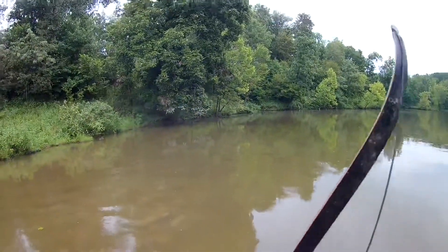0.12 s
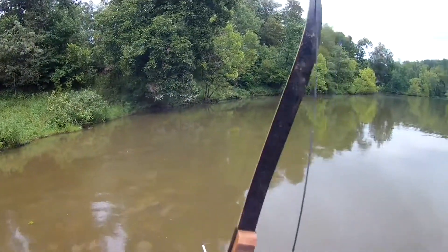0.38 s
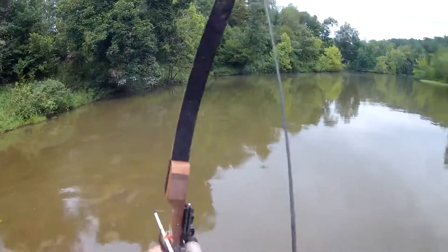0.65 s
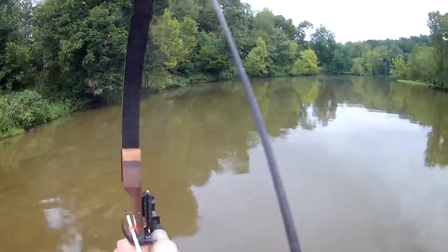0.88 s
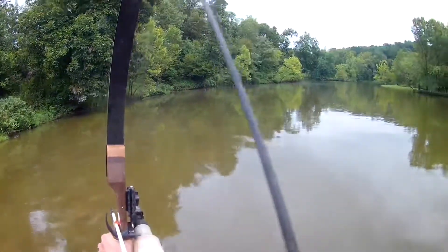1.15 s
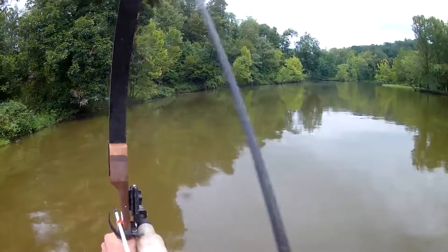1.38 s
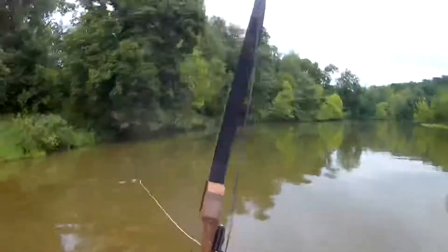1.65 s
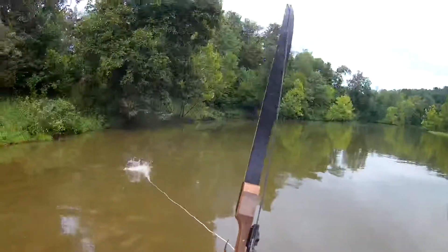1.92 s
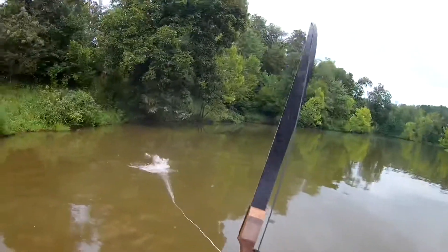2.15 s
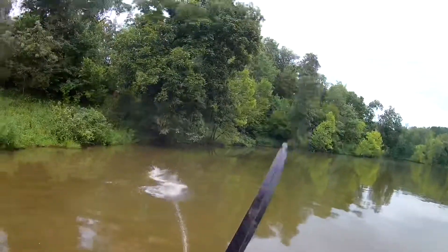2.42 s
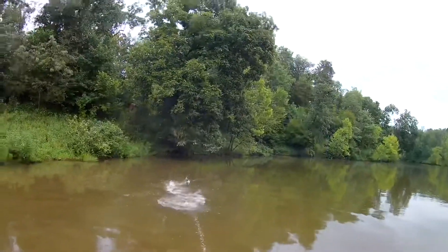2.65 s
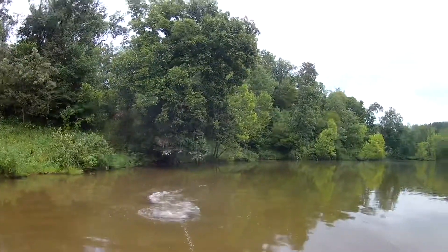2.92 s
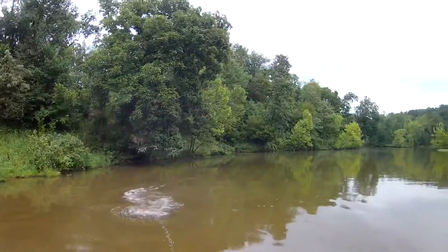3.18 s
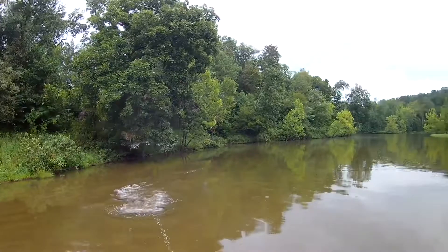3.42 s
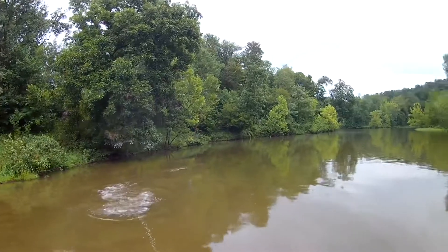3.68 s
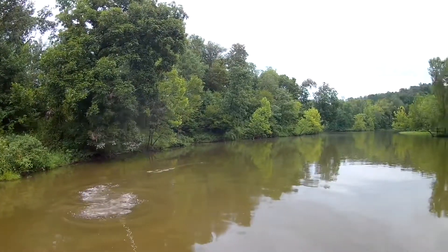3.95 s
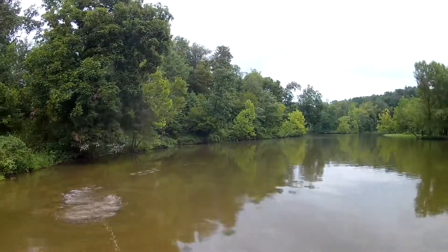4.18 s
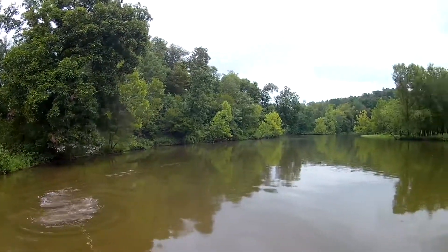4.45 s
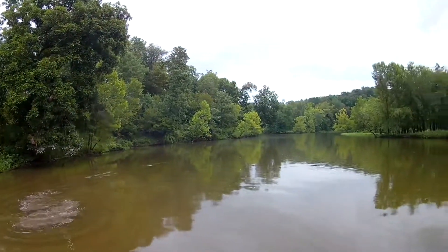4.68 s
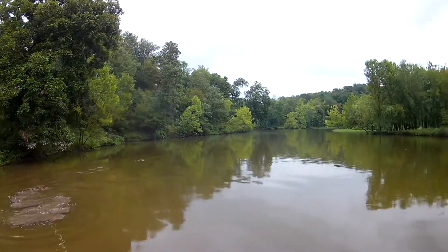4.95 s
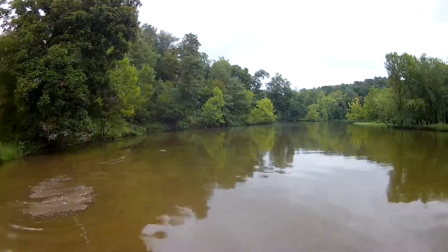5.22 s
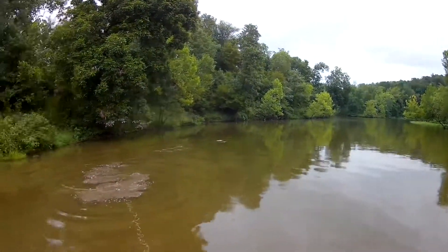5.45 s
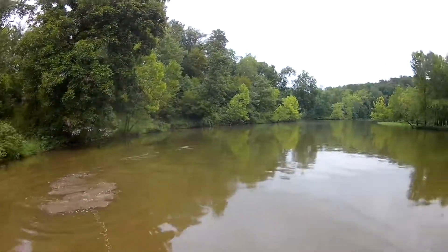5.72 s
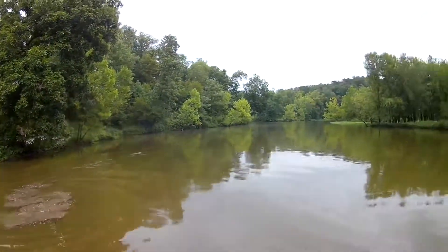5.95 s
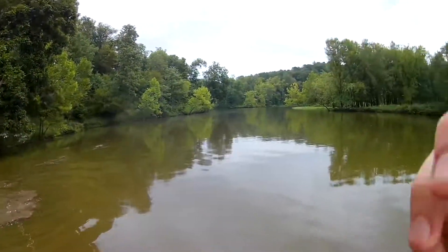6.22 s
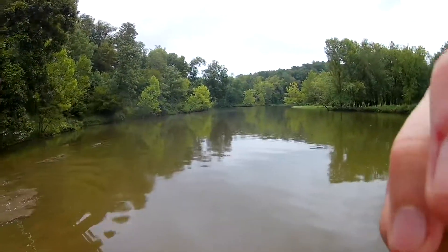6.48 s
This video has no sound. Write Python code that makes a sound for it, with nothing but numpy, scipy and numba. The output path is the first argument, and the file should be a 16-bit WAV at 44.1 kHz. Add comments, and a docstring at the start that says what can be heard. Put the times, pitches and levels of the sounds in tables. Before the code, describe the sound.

After faint ripples and cicadas, a hard bow twang and clack, a brief whirring line, then heavy splashing from a struck fish, dying to bubbles.

```python
"""A large fish, hit by an arrow, thrashes in a creek a few metres off: ringing air pockets and bubble swarms.
Before that a bow is drawn and shot (struck modes, snaps) and its line whips off the reel (gated, coloured noise).
Ripples plop and cavities gulp as gliding damped rings; touches and a knock ring a head-worn camera's shell.
Cicadas hiss and katydids trill as band noise; a light wind rumbles. All is heard through a closed housing."""
import sys
import numpy as np
from scipy import signal
from scipy.fft import rfft, irfft
from scipy.io import wavfile
from scipy.ndimage import uniform_filter1d
from numba import njit

SR = 44100
rng = np.random.default_rng(int(sys.argv[2]) if len(sys.argv) > 2 else 0)


def master_out(mix):
    """Clip the mix to full scale and print it as 16-bit PCM to the path in sys.argv[1]."""
    frames = np.transpose(np.atleast_2d(mix))
    ceiling = np.clip(frames, -1, 1)
    pcm = np.round(ceiling * 32767).astype(np.int16)
    wavfile.write(sys.argv[1], SR, pcm)


def boost_factor(decibels):
    """Convert a level in decibels to a linear amplitude factor."""
    exponent = np.asarray(decibels, float) / 20
    return 10 ** exponent


N = 290995
TIME_S = np.arange(N) / SR


def noise():
    """White noise of unit variance."""
    return rng.standard_normal(N)


def level(x, db):
    """Set the rms level."""
    return x * boost_factor(db) / np.sqrt(np.mean(x ** 2))


def colour(x, points):
    """Causal minimum-phase filter through (frequency [Hz], gain [dB]) points, built from the cepstrum."""
    hz, db = np.transpose(np.array(points, float))
    size = 4096
    bin_hz = np.arange(size // 2 + 1) * SR / size
    gain_db = np.interp(np.log(bin_hz + 1), np.log(hz), db)
    cepstrum = irfft(gain_db * np.log(10) / 20)
    cepstrum[1:size // 2] *= 2
    cepstrum[size // 2 + 1:] = 0
    impulse = irfft(np.exp(rfft(cepstrum)))
    return signal.fftconvolve(x, impulse)[:N]


def resonate(x, peaks):
    """Sum of two-pole resonances (frequency [Hz], width [Hz], level [dB])."""
    out = 0
    for hz, width_hz, db in peaks:
        out = out + boost_factor(db) * signal.lfilter(*signal.iirpeak(hz, hz / width_hz, fs=SR), x)
    return out


def walk(rate_hz):
    """Random levels held 1 / rate_hz and slewed twice; spread near 1."""
    k = int(SR / rate_hz)
    held = np.repeat(rng.standard_normal(N // k + 1), k)
    return 1.6 * uniform_filter1d(uniform_filter1d(held, k), k)[:N]


def snap(start_s, db, width_s):
    """One short back-and-forth pulse."""
    x = (TIME_S - start_s) / width_s
    return boost_factor(db) * x * np.exp(-x ** 2)


def swell(start_s, rise_s, hold_s, db, fade_db_s):
    """Gain of a sound that rises, holds, then fades evenly in dB."""
    rise = np.clip((TIME_S - start_s) / rise_s, 0, 1)
    fading_s = np.maximum(TIME_S - start_s - rise_s - hold_s, 0)
    return rise * boost_factor(db - fade_db_s * fading_s)


@njit
def rings(start_s, hz, t60_s, size, glide, rise_s):
    """Damped oscillators that swell over rise_s and climb by the share glide over their ring."""
    out = np.zeros(N)
    for k in range(len(start_s)):
        start = int(start_s[k] * SR)
        span = int((t60_s[k] + 3 * rise_s[k]) * SR)
        fall = np.exp(-np.log(1000) / (t60_s[k] * SR))
        grow = np.exp(-1 / (rise_s[k] * SR))
        a, b, phase = size[k], 1., 0.
        for i in range(min(span, N - start)):
            phase += 2 * np.pi * hz[k] / SR * (1 + glide[k] * i / span)
            b *= grow
            a *= fall ** (1 - b)  # decay sets in as the swell completes
            out[start + i] += a * (1 - b) * np.sin(phase)
    return out


def strike(modes, start_s, db, rise_s, treble_db=0., centre_hz=1470., focus_db=0., knee_hz=3200):
    """One blow on a table of modes; below knee_hz it favours those near centre_hz, by focus_db per octave."""
    hz, mode_db, t60_s = np.transpose(np.array(modes, float))
    detune, scatter = rng.standard_normal((len(hz), 2)).T
    place_db = np.where(hz > knee_hz, treble_db, -focus_db * abs(np.log2(hz / centre_hz)))
    size = boost_factor(db + mode_db + place_db + 1.17 * scatter)
    one = np.ones(len(hz))
    return rings(start_s * one, hz * (1 + .012 * detune), t60_s, size, 0 * one, rise_s * one)


def swarm(count, start_s, stop_s, low_hz, high_hz, cycles, scatter_db, glide, tilt_db):
    """Bubbles born at random, log-spread in pitch, with scattered levels; the high ones ring briefly."""
    birth, pitch, chance, length = rng.random((count, 4)).T
    hz = low_hz * (high_hz / low_hz) ** pitch
    scatter = np.minimum(-np.log(1 - chance), 4)
    size = boost_factor(scatter_db * scatter + tilt_db * np.log2(hz / low_hz)) * np.sign(length - .5)
    span_s = stop_s - start_s
    out = rings(start_s + span_s * birth, hz, cycles * (.5 + length) / hz, size, glide * length, 0.64 / hz)
    return out / np.sqrt(np.mean(out ** 2) * N / SR / span_s)


def pockets(events, glide, brood_db):
    """Air pockets ring upward; smaller bubbles torn off by the same smack start with them or just behind."""
    start_s, db, hz, cycles = np.transpose(np.array(events, float))
    glides = glide + 0 * start_s
    out = rings(start_s, hz, np.clip(cycles, 1.5, 40) / hz, boost_factor(db + 4.5), glides, 1.6 / hz)
    for lag, ratio in zip(*rng.random((len(start_s), 8, 2)).T):
        small_hz = np.minimum(hz * (0.71 + 3.95 * ratio), 900 + 600 * ratio)
        small_size = boost_factor(db + brood_db - 2.0 * lag)
        out = out + rings(start_s + 0.027 * lag ** 3, small_hz, 6 / small_hz, small_size, glides, 0.58 / small_hz)
    return out


# colour of far leaves and water: (frequency [Hz], relative level [dB])
AIR_COLOUR = [(60, -9.5), (150, 0.5), (300, -5.5), (860, -11.5), (1500, -14.5), (2200, -20.5), (3600, -24),
              (5300, -30.5), (8200, -28.5), (9500, -29.5), (12000, -19)]
# puffs of wind: (start [s], hold [s], level [dB])
WIND_PUFFS = [(0.357, 0.19, -66.5), (5.154, .2, -64.5)]
# soft bumps against the head strap: (time [s], level [dB], width [s])
STRAP_BUMPS = [(0.894, -39.5, .005), (.952, -46, .004), (6.592, -49, 0.0038)]


def outdoors():
    """Far leaves and water, a rustle of cloth while the bow is drawn, and the rumble of the breeze."""
    far = level(colour(noise(), AIR_COLOUR), -65.5) * boost_factor(0.48 * walk(3.65))
    lapping = swarm(count=1500, start_s=0., stop_s=6.6, low_hz=149.0, high_hz=1600, cycles=11.7,
                    scatter_db=2.0, glide=0.69, tilt_db=1.5)
    cloth = colour(noise(), [(100, -7), (300, 6), (1200, -2), (2400, -7.0), (4500, -24), (12000, -48)])
    drawn = np.exp(-((TIME_S - .6) / .5) ** 4)
    rustle = drawn * level(cloth, -70.5) * boost_factor(1.7 * walk(18.3))
    low = colour(noise(), [(10, -9.5), (28, -1.5), (60, -5), (110, -5.0), (200, -29.5), (500, -33.0), (2000, -49)])
    breeze_db, puff_rise_s, puff_fade_db_s = -68, 0.056, 90
    power = boost_factor(breeze_db) ** 2
    for start_s, hold_s, db in WIND_PUFFS:
        power = power + swell(start_s, puff_rise_s, hold_s, db, puff_fade_db_s) ** 2
    rumble = level(low, 0) * np.sqrt(power) * boost_factor(1.1 * walk(5) + 0.4 * walk(27))
    bumps = sum(snap(*row) for row in STRAP_BUMPS)
    return far + boost_factor(-78) * lapping + rustle + rumble + bumps


# katydid phrases: (first pulse [s], last pulse [s], pulse rate [Hz], level [dB])
KATYDID_PHRASES = [(0.1085, 1.05, 35.5, -77.5), (3.033, 4.02, 35.2, -79), (5.3, 6.15, 35, -82.5),
                   (4.55, 6.36, 32.9, -82)]


def insects():
    """A smooth cicada chorus of band noise, and katydids whose wing strokes gate a high hiss."""
    band = [(6450, 1380, 0)]
    hiss = resonate(resonate(resonate(noise(), band), band), band)
    chorus = level(hiss, -70.5) * boost_factor(0.84 * walk(2.7) + 0.61 * walk(60))
    strokes = 0
    for first_s, last_s, rate_hz, db in KATYDID_PHRASES:
        along = np.clip((TIME_S - first_s) / (last_s - first_s), 0, 1)
        phrase = np.sin(np.pi * along ** 1.6) ** .3
        pulses = np.exp(1.5 * (np.cos(2 * np.pi * rate_hz * (TIME_S - first_s)) - 1))
        strokes = strokes + boost_factor(db) * phrase * pulses
    wing = [(11550, 1500, 21), (10200, 1200, -21)]
    return chorus + 2.47 * strokes * level(resonate(resonate(noise(), wing), wing), 0)


# modes of the camera shell: (frequency [Hz], level [dB], t60 [s])
SHELL_MODES = [(726, -3, .025), (874, 4.5, 0.011), (1110, -1, 0.024), (1489, 4.5, 0.019), (2010, 1, 0.01),
               (2800, -5.5, 0.022), (3800, -6, 0.0051), (4540, -9, 0.0054), (5940, -8, 0.0042),
               (9830, -12.5, 0.0056), (12070, -10.5, 0.007)]
# gear and fingers touching the camera; at 1.648 s a knock of the bow limb:
# (time [s], level [dB], relative treble [dB], ring centre [Hz])
TOUCHES_AND_KNOCK = [(0.0885, -45.5, -14.5, 1600), (0.1528, -55, -12, 1570), (0.1865, -54, -32, 910),
                     (0.3085, -54, -13, 1620), (0.4907, -57, -21, 1290), (1.163, -45, -9.5, 1500),
                     (1.5844, -33, -14, 886), (1.6484, -32, -26, 1110), (1.6827, -46, -19, 1280),
                     (3.5934, -52.5, -19, 1390), (3.675, -52.5, -5.5, 1250), (6.155, -56.5, -5, 2830),
                     (6.4472, -54, -13, 1440), (6.4543, -47.5, -16, 1400), (6.5817, -47.5, -11, 1410),
                     (6.5893, -45.5, -8, 1560), (6.5944, -44.5, -9, 1450)]


def touches_and_knock():
    """Each is a dry, wide click that rings the shell, with a brighter tap, weaker below, just behind."""
    out = 0
    for start_s, db, treble_db, centre_hz in TOUCHES_AND_KNOCK:
        out = out + snap(start_s + .0005, db + 1, .00012)
        out = out + snap(start_s + .0005, db + treble_db + 14, .00003)
        out = out + strike(SHELL_MODES, start_s, db - 0.5, 0.001, treble_db + 8, centre_hz, focus_db=8.5)
        tap_s = start_s + .004 * rng.random()
        out = out + strike(SHELL_MODES, tap_s, db - 5.0, 0.00064, treble_db + 19, centre_hz, focus_db=10)
    return out


# small plops and laps: (time [s], level [dB], pitch [Hz], ring [cycles])
RIPPLE_PLOPS = [(0.288, -56, 544, 9.3), (0.398, -52.5, 950, 11), (0.586, -55.5, 235, 6),
                (0.819, -48.5, 590, 12.5), (0.861, -49, 530, 3.8), (0.874, -51.5, 252, 3.7),
                (1.013, -52, 225, 4.3), (1.392, -56, 315, 12), (4.36, -60, 800, 13),
                (4.863, -53.5, 217, 2.7), (5.025, -48.5, 378, 7.9), (5.193, -49, 204, 1.8),
                (5.24, -58, 600, 7.5), (5.351, -50, 199, 3.7), (5.56, -44.5, 226, 2.3)]


def ripples():
    """Small air pockets under ripples ring upward, each with a brood of smaller bubbles."""
    return pockets(RIPPLE_PLOPS, glide=0.49, brood_db=-1)


# draw, loose, arrow over the rest, string stopped, line running, line slack:
# (start [s], rise [s], hold [s], level [dB], fade [dB/s])
SLIDE_FORCES = [(0.323, 0.052, 0.092, -75, 25), (1.479, 0.013, .02, -53.5, 900),
                (1.508, 0.011, 0.0048, -38, 900), (1.54, .003, .004, -45, 380),
                (1.566, 0.024, 0.26, -57.5, 300), (1.852, .04, 0.29, -66.5, 18)]
# body of the slide: (frequency [Hz], width [Hz], level [dB])
SLIDE_BODY = [(2190, 1700, -3.5), (3160, 100, -11), (3870, 370, 2), (4670, 190, -6.5), (5500, 190, -2),
              (6330, 340, -8)]
# top of the slide: (frequency [Hz], width [Hz], level [dB])
SLIDE_TOP = [(8300, 5900, 0), (10800, 1200, 0.004)]


def line():
    """Coils flick off the reel about 120 times a second over a rubbing hiss; later a faint narrow hiss lingers."""
    stretch, size = rng.standard_normal((900, 2)).T
    flicks = (np.cumsum(0.0079 * boost_factor(3.0 * stretch)) * SR).astype(int)
    inside = flicks < N
    gate = np.zeros(N)
    gate[flicks[inside]] = boost_factor(3.5 * size)[inside]
    gate = .3 + signal.lfilter([1], [1, -np.exp(-1 / (.002 * SR))], gate)
    # until the string stops, the slide is smooth
    gate[TIME_S < 1.545] = np.sqrt(np.mean(gate ** 2))
    rub = gate * noise()
    force = np.sqrt(sum(swell(*row) ** 2 for row in SLIDE_FORCES))
    # harder is brighter, by 0.52 dB per dB about a -56.5 dB slide, up to a limit
    top_gain = np.minimum(boost_factor(-7.5) * (force / boost_factor(-56.5)) ** 0.52, boost_factor(-2))
    slide = level(resonate(rub, SLIDE_BODY), 1.0) + top_gain * level(resonate(rub, SLIDE_TOP), 1.3)
    narrow = [(1430, 160, 0)]
    linger = np.exp(-((TIME_S - 3.36) / 0.19) ** 4) * level(resonate(resonate(rub, narrow), narrow), -73)
    return force * slide + linger


# closing cavities: (time [s], level [dB], from [Hz], to [Hz], glide time [s])
CAVITY_GULPS = [(0.913, -53.5, 993, 1053, 0.028), (1.803, -30.5, 170, 232, 0.024),
                (2.045, -52, 806, 1450, 0.03), (2.115, -41, 885, 1350, 0.024),
                (2.151, -41, 617, 1200, 0.028), (2.388, -37.5, 226, 300, 0.014),
                (3.842, -62, 268, 468, 0.032), (3.863, -53, 420, 967, 0.027), (3.954, -59, 800, 954, .018),
                (4.007, -54, 880, 1150, .011)]


def gulps():
    """A cavity that closes sings a rough rising note, reaching the upper pitch after its glide time."""
    start_s, db, from_hz, to_hz, length_s = np.transpose(np.array(CAVITY_GULPS, float))
    # rings() glides over four lengths
    notes = rings(start_s, from_hz, 3 * length_s, boost_factor(db), 4 * (to_hz / from_hz - 1), length_s / 3)
    return notes * boost_factor(4 * walk(450))


# bow limbs and riser: (frequency [Hz], level [dB], t60 [s])
LIMB_MODES = [(82, 2.5, 0.22), (169, -3.5, 0.12), (305, -8.5, 0.31), (506, -14.5, 0.44), (718, -1, 0.14),
              (1110, -6, 0.15), (1462, -3, 0.15), (2290, -22, 0.11)]


def bow():
    """Release: the riser hums as the arrow runs over the rest, the string slams home, the limbs shudder."""
    hum = rings(np.array([1.5075]), np.array([775.]), np.array([.075]), boost_factor(np.array([-16.5])),
                np.array([.02]), np.array([.005]))
    limbs = strike(LIMB_MODES, 1.505, -39, 0.006) + strike(LIMB_MODES, 1.5375, -31.0, 0.00083)
    # the string stops dead against the limbs
    stop = snap(1.54395, -4, .00017) + snap(1.54390, -7, .000027)
    shell = strike(SHELL_MODES, 1.5442, -28, .0002, treble_db=-4.)
    click = snap(1.5163, -14, .00003)
    # the jolt shakes the camera itself
    jolt = rings(np.array([1.506, 1.538]), np.array([45., 62.]), np.array([.12, .15]),
                 boost_factor(np.array([-36., -36.])), np.zeros(2), np.array([.004, .003]))
    # loose parts chatter while the limbs settle
    chatter = swarm(count=900, start_s=1.5, stop_s=1.8, low_hz=170, high_hz=2000, cycles=5.9,
                    scatter_db=0.0, glide=0.033, tilt_db=3.0)
    onset = np.clip((TIME_S - 1.502) / 0.0055, 0, 1)
    age_s = np.maximum(TIME_S - 1.55, 0)
    settle = boost_factor(-35 - 260 * age_s) + boost_factor(-48 - 33 * age_s)
    return hum + limbs + stop + shell + click + jolt + chatter * onset * settle


# bursting froth: (frequency [Hz], width [Hz], level [dB])
FROTH_BANDS = [(4700, 700, -2), (2920, 1100, -5), (9500, 2000, -9.5)]


def fizz():
    """Froth builds up during the thrashing and bursts with a thin hiss."""
    hiss = level(resonate(noise(), FROTH_BANDS), 0) * boost_factor(2.5 * walk(70))
    return hiss * swell(1.75, 0.26, 0.52, -71.5, 24)


def stirred(tilt_db):
    """How hard the slaps have just stirred the water; tilt_db per octave of slap pitch above 300 Hz."""
    rise_s, fade_db_s = 0.019, 254
    power = 0
    for start_s, db, hz, _ in FISH_SLAPS:
        tilted_db = db + tilt_db * max(np.log2(hz / 300), 0)
        power = power + swell(start_s - rise_s / 2, rise_s, 0, tilted_db, fade_db_s) ** 2
    return np.sqrt(power)


# large air pockets under tail and body: (time [s], level [dB], pitch [Hz], ring [cycles])
FISH_SLAPS = [(1.78, -26.5, 277, 2), (1.849, -32.5, 296, 5.1), (1.805, -38, 110, 3.8),
              (1.927, -42, 327, 11), (1.985, -39.5, 86.4, 5.8), (2.032, -33.5, 307, 5.6),
              (2.104, -34.5, 695, 4.4), (2.209, -31.5, 1110, 5.6), (2.218, -32, 654, 10.6),
              (2.262, -41, 895, 5), (2.289, -33.5, 465, 7), (2.341, -30.5, 1430, 10),
              (2.466, -36, 403, 9.6), (2.482, -29.5, 251, 8.1), (2.55, -49, 563, 7.6),
              (2.64, -36.5, 497, 4.7), (2.819, -44.5, 461, 5.8), (2.866, -41.5, 1050, 6.8),
              (2.984, -44, 1130, 5)]


def fish():
    """Thrashing, then tiring: deep gurgle and finer spray in quick surges, stray gliding bubbles, loud slaps."""
    start_s, rise_s, hold_s, spray_lingers_s = 1.785, 0.014, 0.84, 0.058
    foam = swell(start_s, rise_s, hold_s, -60.5, 16.5)  # bubbles still surfacing afterwards
    deep = swell(start_s, rise_s, hold_s, -51.5, 77)
    fine = swell(start_s, rise_s, hold_s + spray_lingers_s, -57, 66)
    # high slaps stir the gurgle less, the spray more
    deep = np.sqrt(deep ** 2 + foam ** 2 + (boost_factor(-13.5) * stirred(-2.5)) ** 2)
    fine = np.sqrt(fine ** 2 + foam ** 2 + (boost_factor(-19.5) * stirred(1.25)) ** 2)
    gurgle = swarm(count=3400, start_s=1.74, stop_s=3.9, low_hz=170, high_hz=800, cycles=7.2,
                   scatter_db=3.5, glide=0.8, tilt_db=5.0)
    spray = swarm(count=4200, start_s=1.74, stop_s=3.9, low_hz=730, high_hz=1800, cycles=4.0,
                  scatter_db=-0.5, glide=0.37, tilt_db=0.0)
    strays = swarm(count=130, start_s=1.74, stop_s=3.9, low_hz=300, high_hz=1200, cycles=26,
                   scatter_db=1.5, glide=0.9, tilt_db=4.5)
    surge_db = 1.8 * walk(50)
    body = boost_factor(surge_db) * (deep * gurgle + fine * spray)
    slaps = pockets(FISH_SLAPS, glide=0.13, brood_db=-8)
    return body + boost_factor(-18.5) * deep ** 0.79 * strays + slaps


def scene():
    """Everything, with a short scatter of water and bow back from water and banks."""
    water = fish() + gulps() + ripples()
    # heard through the closed housing, water loses its treble
    near = colour(water, [(60, -1), (150, 0.5), (1700, 0.0), (2500, -7), (6000, -24)]) + bow()
    tail_s = np.arange(8000) / SR
    tail = rng.standard_normal(8000) * boost_factor(-60 * tail_s / 0.22)
    scatter = signal.fftconvolve(near, tail / np.sqrt(np.sum(tail ** 2)))[:N]
    near = near + boost_factor(-13) * scatter
    return (near + fizz() + line() + touches_and_knock() + insects() + outdoors())[None]


def band_limit(x):
    """A steep low-pass at the top of the band."""
    return signal.sosfilt(signal.butter(12, 13110, fs=SR, output="sos"), x)


# microphone port: (frequency [Hz], gain [dB])
PORT_RESPONSE = [(20, -0.5), (7000, 0), (7550, 1.5), (7950, -18), (8300, -4), (8800, 0), (12000, 0.5)]


def record(dry):
    """The port has a notch near 8 kHz, the capsule adds its own faint hiss behind it; the top is cut steeply."""
    hiss_colour = [(100, -17), (3000, -13), (7000, 5.5), (9000, -1.0), (12000, -6.5)]
    hiss = level(colour(noise(), hiss_colour), -77)
    top_cut = signal.ellip(10, .3, 60, 12030, fs=SR, output="sos")
    mix = signal.sosfilt(top_cut, colour(dry[0], PORT_RESPONSE) + hiss)
    return band_limit(mix[None])


dry = scene()
out = record(dry)
master_out(out)
```